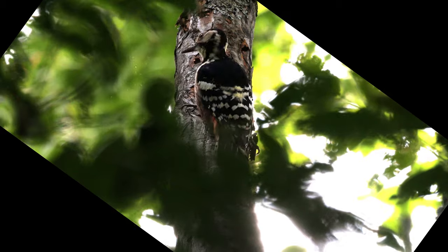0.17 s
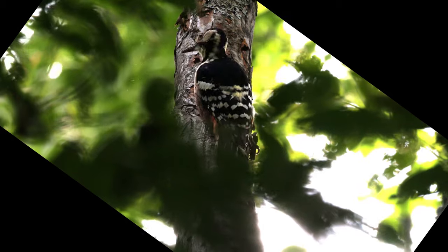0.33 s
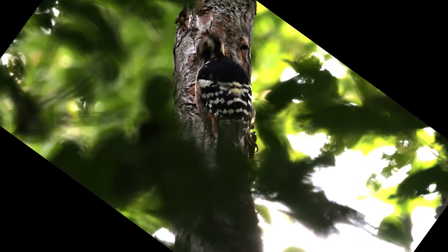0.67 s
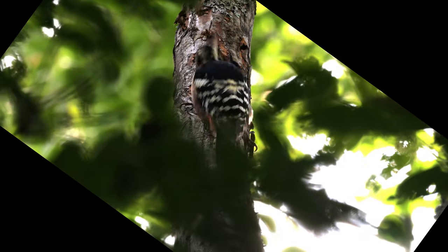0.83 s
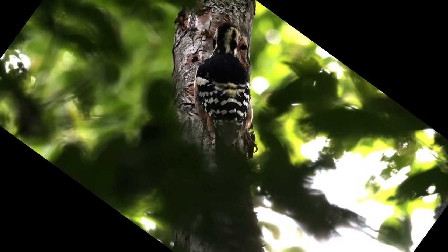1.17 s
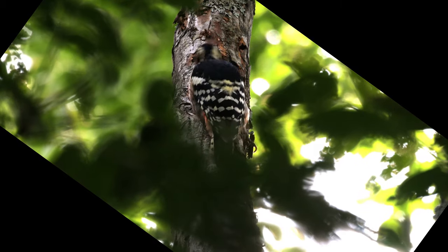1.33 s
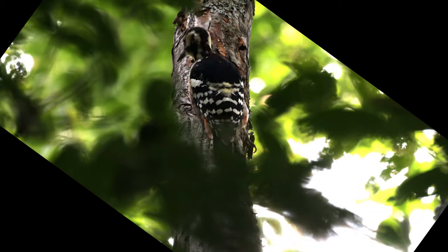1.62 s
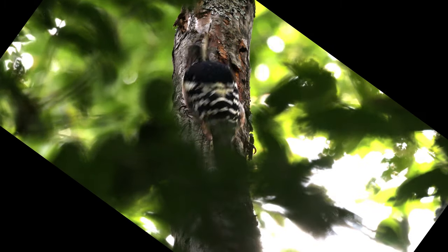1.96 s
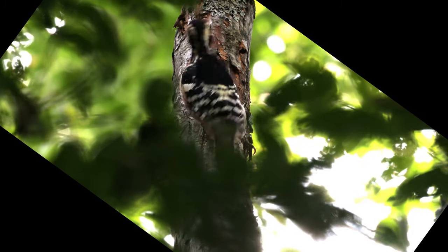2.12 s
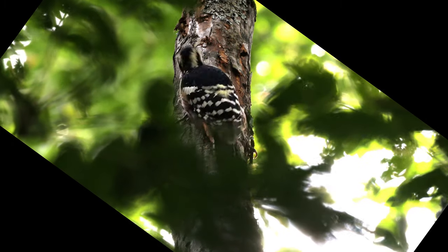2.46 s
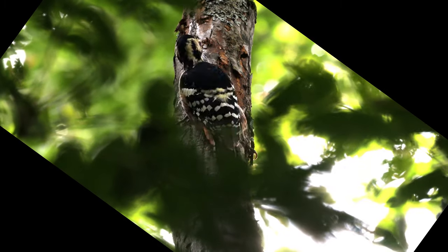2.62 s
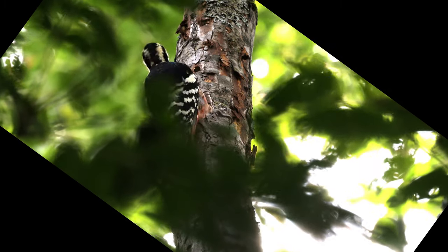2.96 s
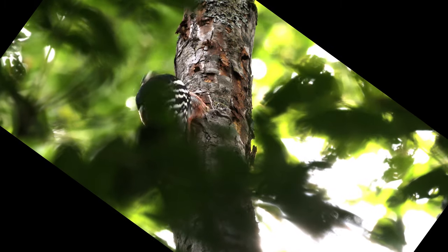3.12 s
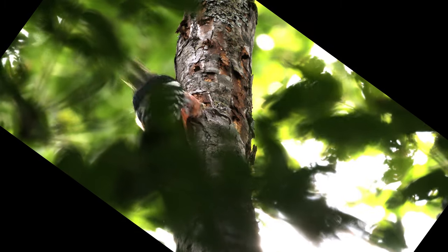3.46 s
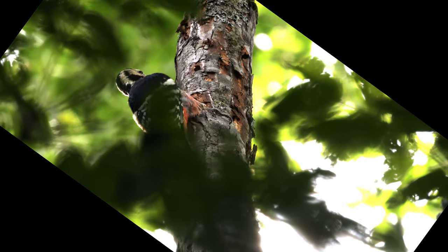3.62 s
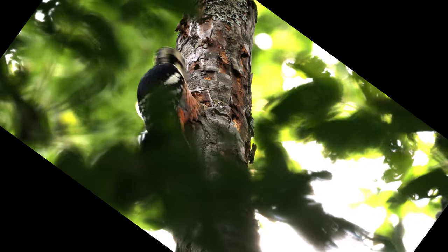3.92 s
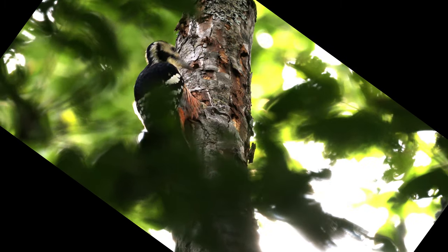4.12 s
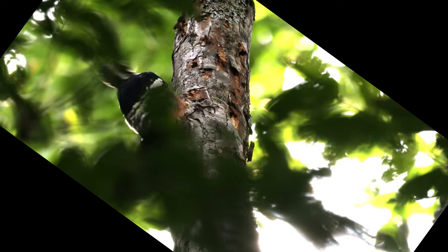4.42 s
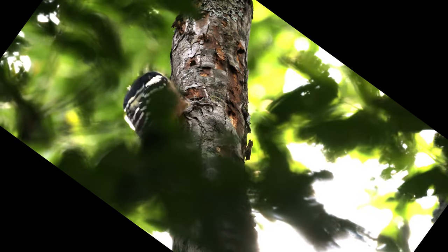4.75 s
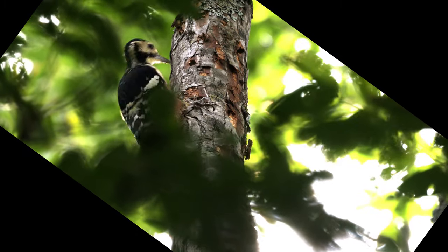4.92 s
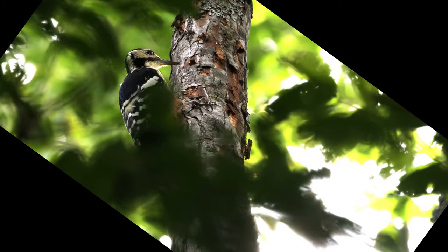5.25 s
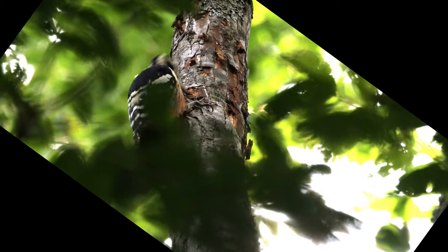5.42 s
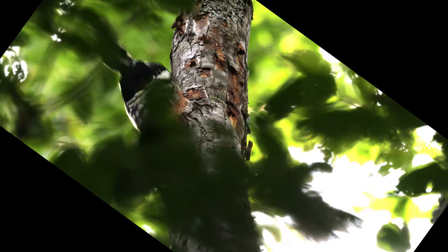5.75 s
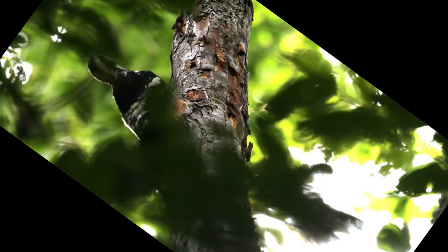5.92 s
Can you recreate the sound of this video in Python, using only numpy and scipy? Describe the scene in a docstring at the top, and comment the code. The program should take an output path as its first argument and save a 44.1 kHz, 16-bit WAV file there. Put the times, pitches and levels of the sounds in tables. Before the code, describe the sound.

A steady low drone and a soft hiss of air fill a wood for the whole six seconds, with just a trace of rumble underneath. At about 0.6 seconds a woodpecker starts pecking a tree trunk. Each peck is a dull, low thud with very quick echoes and a short low ring scattered by the trees. Ten pecks come unevenly, mostly in pairs, growing a little stronger until about 2.6 seconds. The bird pauses while it shifts round the trunk. From 3.3 seconds ten more pecks follow, slightly higher, mostly louder and more irregularly spaced. The hardest land near 3.7, 4.1, 4.9 and 5.3 seconds, with light ones near 4.5 and 5.6 and a last knock at 6 seconds. Flaking bark adds tiny, very faint bright ticks near 0.1, 1.6, 2.6 and 6 seconds.

```python
"""In a wood, a woodpecker chisels at a trunk and shifts round it halfway through.
Each peck swings the damped trunk for a few cycles: a dull thud, quick echoes, then a
short low ring scattered by the trees. Flakes of bark give way with faint ticks.
Behind it lie a steady low drone, a trace of rumble and the soft hiss of the air."""
import sys
import numpy as np
from scipy import signal
from scipy.fft import rfft, irfft
from scipy.io import wavfile

SR = 44100
rng = np.random.default_rng(int(sys.argv[2]) if len(sys.argv) > 2 else 0)


def materialize(psi):
    """Save the field psi as 16-bit PCM at rate SR to the path in sys.argv[1].

    A 1-D psi becomes a single channel; in a 2-D psi each row is a channel.
    """
    bounded = np.clip(np.atleast_2d(psi).T, -1, 1)
    quanta = np.round(bounded * 32767).astype(np.int16)
    wavfile.write(sys.argv[1], SR, quanta)


N = 268083
TIME = np.arange(N) / SR

# time_s, level_db
PECK_HITS = [(0.6166, -31.5), (0.7752, -28.5), (1.0249, -30), (1.197, -28.5), (1.517, -30.5),
             (1.6869, -26.5), (1.9763, -29.5), (2.1562, -26), (2.345, -26), (2.5552, -27.5),
             (3.2884, -24.5), (3.461, -22), (3.666, -20), (4.0574, -20.5), (4.5253, -30.5), (4.6905, -25.5),
             (4.9418, -20.5), (5.297, -19), (5.5782, -32), (5.9839, -26.5)]
# delay_s, signed_gain; before and after the hop
FRONT_ECHOES = [(0.0128, -0.5), (.0208, -0.36), (0.0333, 0.37), (.0408, -0.46), (.0486, .2),
                (0.0795, 0.014)]
SIDE_ECHOES = [(0.013, -0.35), (0.0232, -0.49), (0.0314, -0.25), (0.0402, -0.19), (.0494, -.15),
               (0.069, 0.052)]
# pitch_hz, echo_db; for a medium peck
FRONT_SPOT = (239.2, 0.7)
SIDE_SPOT = (257, -1.5)

def pecks(hop_s=2.9, medium_db=-25, pitch_hz_per_db=1.43, echo_loss_db_per_db=0.26,
          scatter_db=-23, scatter_t60_s=0.45, build_s=0.0017, scatter_band_hz=(185, 350)):
    """Thud, echoes and diffuse tail. A harder blow sounds higher and stands further above its echoes."""
    hits, tail_power = np.zeros(N), np.zeros(N)
    for time_s, level_db in PECK_HITS:
        spot_hz, spot_echo_db = FRONT_SPOT if time_s < hop_s else SIDE_SPOT
        paths = FRONT_ECHOES if time_s < hop_s else SIDE_ECHOES
        force_db = level_db - medium_db
        pitch_hz = spot_hz + pitch_hz_per_db * force_db
        echo_db = spot_echo_db - echo_loss_db_per_db * force_db
        span = slice(max(int((time_s - .03) * SR), 0), int((time_s + .4) * SR))
        t = TIME[span] - time_s
        echoes = sum(gain * thud(t - delay_s, pitch_hz) for delay_s, gain in paths)
        hits[span] += from_db(level_db) * (thud(t, pitch_hz) + from_db(echo_db) * echoes)
        age_s = np.maximum(t, 0)
        tail = np.exp(-np.log(1000) * age_s / scatter_t60_s) * (1 - np.exp(-age_s / build_s))
        tail_power[span] += (from_db(level_db) * tail) ** 2
    band = signal.butter(2, scatter_band_hz, "band", fs=SR, output="sos")
    scatter = unit_rms(signal.sosfilt(band, signal.sosfilt(band, rng.standard_normal(N))))
    return cut_deep_bass(hits + from_db(scatter_db) * np.sqrt(tail_power) * scatter)


def thud(t, pitch_hz, rise_s=0.0037, fall_s=0.0032, knock_db=-27, knock_hz=390, knock_s=0.0015):
    """The damped trunk swings a few cycles, with a briefer, higher knock at contact."""
    swing = np.cos(2 * np.pi * pitch_hz * t) * swell(t, rise_s, fall_s)
    knock = np.cos(2 * np.pi * knock_hz * t) * swell(t, knock_s, knock_s)
    return -(swing + from_db(knock_db) * knock)


def cut_deep_bass(x, cutoff_hz=158):
    """A steep high-pass leaves the pecks with almost no deep bass."""
    hz = np.arange(N // 2 + 1) * SR / N
    slope = (hz / cutoff_hz) ** 12
    return irfft(rfft(x) * slope / (1 + slope), N)


# time_s, level_db, pitch_hz, width_hz, fall_s
BARK_FLAKES = [(0.145, -70, 11500, 4000, .004), (1.592, -75, 11500, 4000, .02),
               (2.572, -78, 11000, 4000, .012), (5.985, -72, 10000, 600, 0.0028)]

def bark():
    """Flakes of bark give way with tiny bright ticks."""
    ticks = np.zeros(N)
    for time_s, level_db, pitch_hz, width_hz, fall_s in BARK_FLAKES:
        edges_hz = [pitch_hz - width_hz / 2, pitch_hz + width_hz / 2]
        band = signal.butter(1, edges_hz, "band", fs=SR, output="sos")
        fizz = unit_rms(signal.sosfilt(band, rng.standard_normal(N)))
        ticks += from_db(level_db) * swell(TIME - time_s, fall_s / 2, fall_s) * fizz
    return ticks


# freq_hz, density_db
DRONE_SPECTRUM = [(112, -39), (128, -29.5), (141, -15), (168, -13), (192, -5.5), (214, -3), (250, 0),
                  (290, -1), (320, -6), (355, -10), (400, -15), (445, -21.5), (490, -39.5)]
RUMBLE_SPECTRUM = [(10, -5), (22, -8.5), (35, -7.5), (48, -6.5), (62, -22.5), (100, -13), (130, -20)]
AIR_SPECTRUM = [(300, -12.5), (480, -3), (700, 0), (850, -3), (1020, -11.5), (1200, -14), (2100, -16),
                (3300, -17.5), (4500, -21), (7000, -25), (8600, -27.5), (10000, -24), (12500, -21),
                (16000, -22.5)]
# centre_hz, width_hz, lift_db
DRONE_RESONANCE = [(243.3, 29.5, 9.5)]
AIR_RESONANCES = [(1526, 448, 10.5), (2723, 560, 6), (3730, 400, 3), (5760, 910, 6.5)]

def background(drone_db=-46, rumble_db=-81, hiss_db=-63):
    """Steady noise: narrow low drone, faint rumble, hiss of the air."""
    drone = from_db(drone_db) * shaped_noise(DRONE_SPECTRUM, DRONE_RESONANCE)
    rumble = from_db(rumble_db) * shaped_noise(RUMBLE_SPECTRUM)
    hiss = from_db(hiss_db) * shaped_noise(AIR_SPECTRUM, AIR_RESONANCES)
    return drone + rumble + hiss


def shaped_noise(spectrum, resonances=()):
    """Unit-rms noise: smooth spectrum plus bell-shaped resonances."""
    hz = np.maximum(np.arange(N // 2 + 1) * SR / N, 1)
    freq_hz, density_db = np.array(spectrum).T
    gain_db = np.interp(np.log(hz), np.log(freq_hz), density_db, left=-120, right=-120)
    for centre_hz, width_hz, lift_db in resonances:
        gain_db += lift_db * .5 ** ((2 * (hz - centre_hz) / width_hz) ** 2)
    return unit_rms(irfft(rfft(rng.standard_normal(N)) * from_db(gain_db), N))


def swell(t, rise_s, fall_s):
    """Two-sided Gaussian envelope, peak at t = 0."""
    return np.exp(-.5 * (t / np.where(t < 0, rise_s, fall_s)) ** 2)


def from_db(db):
    """Decibels to gain."""
    return 10 ** (np.asarray(db) / 20)


def unit_rms(x):
    """Scale to unit rms."""
    return x / np.sqrt(np.mean(x ** 2) + 1e-20)


def scene():
    """Bird and wood, mono."""
    return (pecks() + bark() + background())[None, :]


def record(dry, silence_s=.0715, fade_s=.0005, cutoff_hz=15850):
    """Brief opening silence, steep low-pass."""
    fade_in = np.clip((TIME - silence_s) / fade_s, 0, 1)
    lowpass = signal.ellip(12, .1, 80, cutoff_hz, fs=SR, output="sos")
    return signal.sosfilt(lowpass, dry * fade_in)


dry = scene()
out = record(dry)
materialize(out)
```